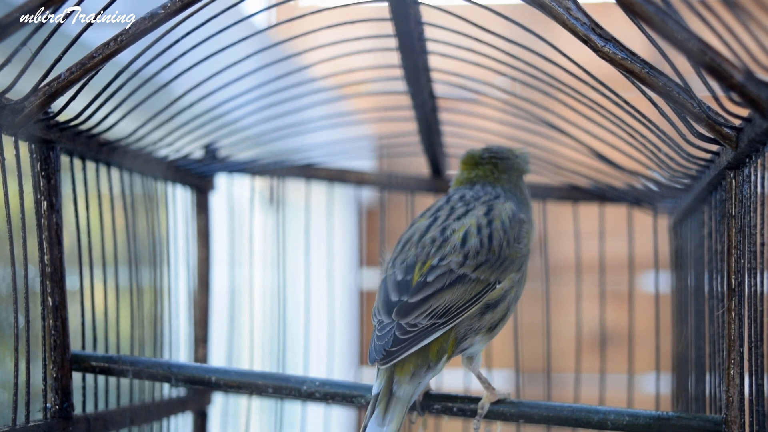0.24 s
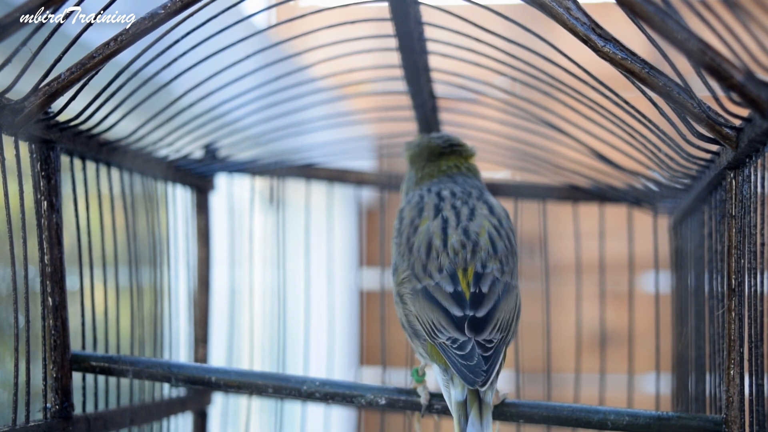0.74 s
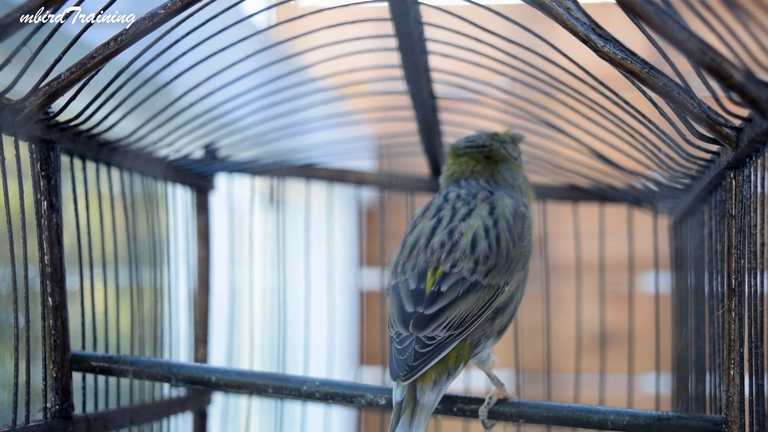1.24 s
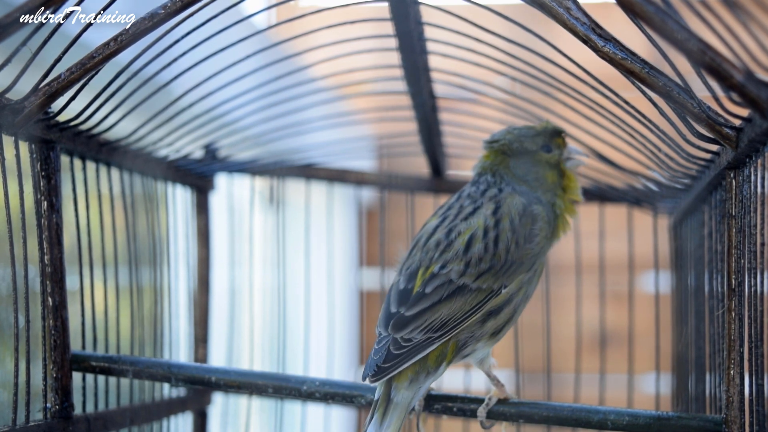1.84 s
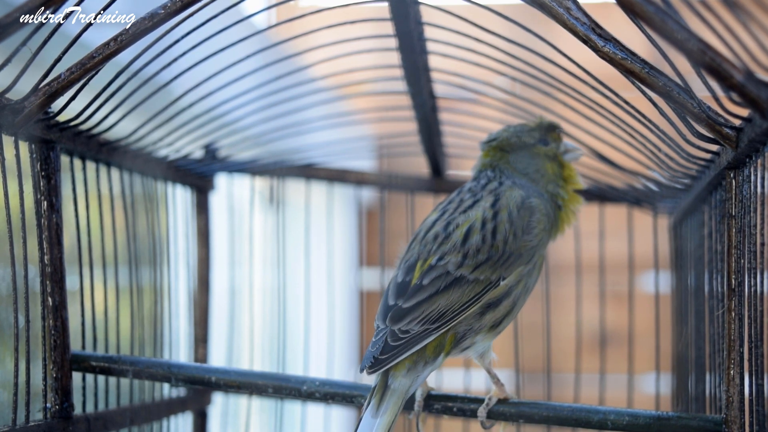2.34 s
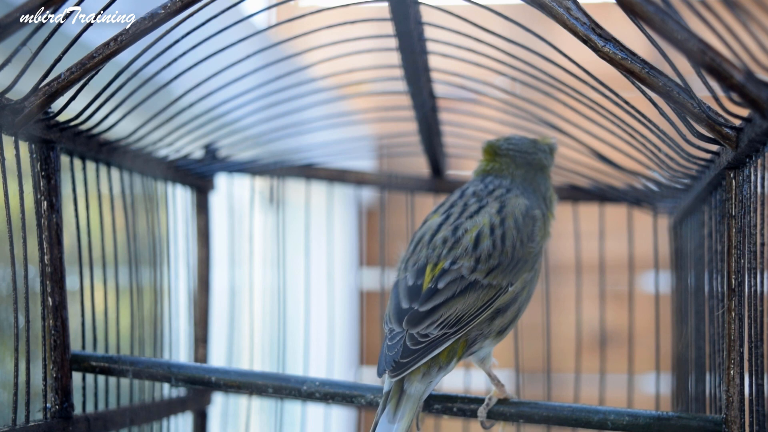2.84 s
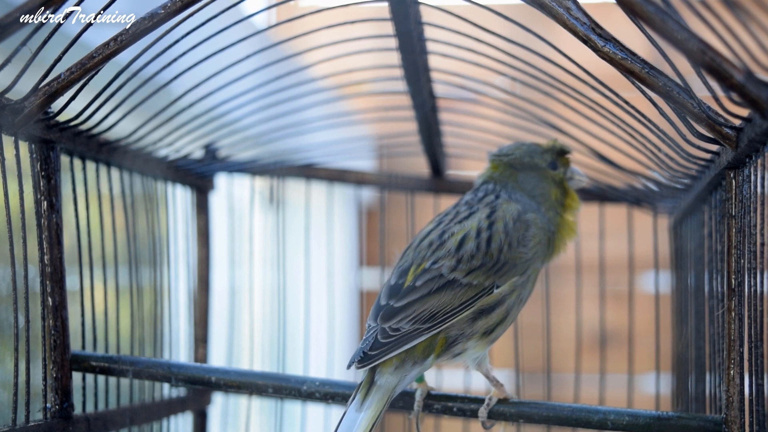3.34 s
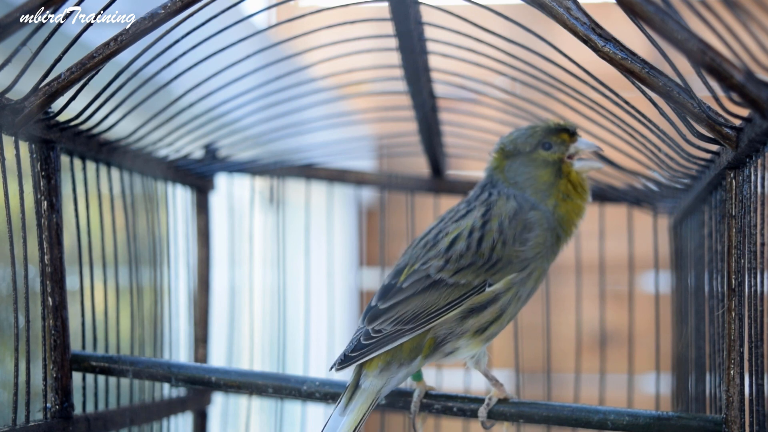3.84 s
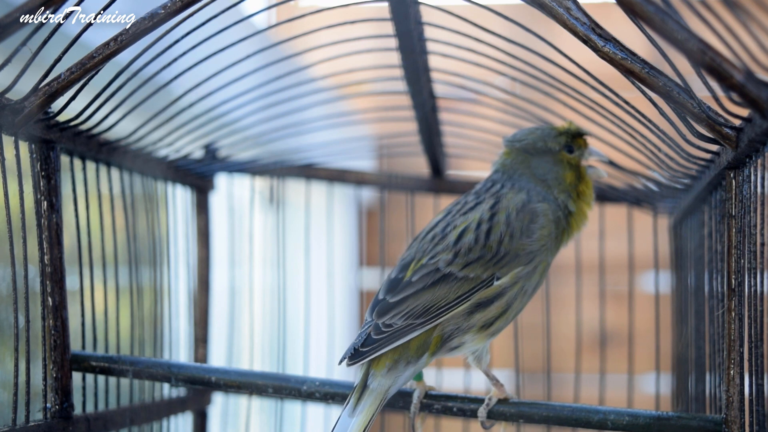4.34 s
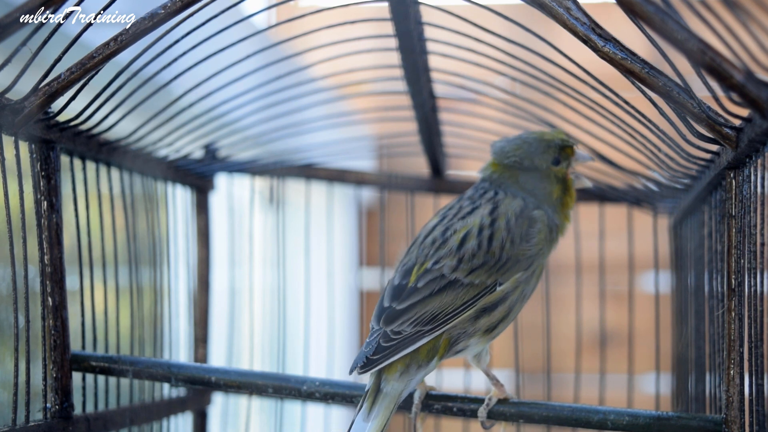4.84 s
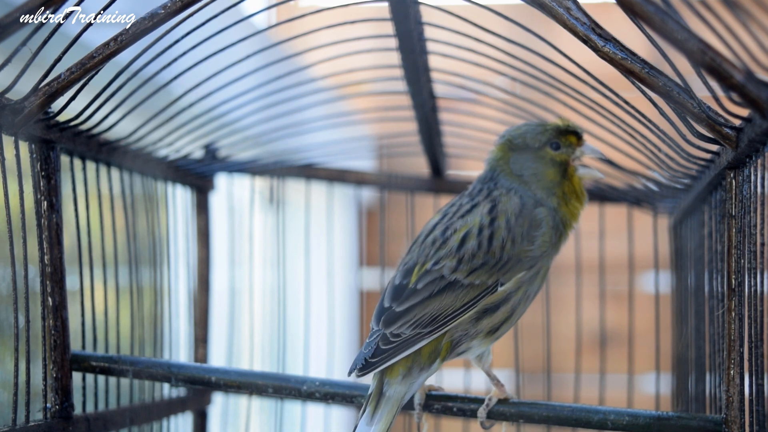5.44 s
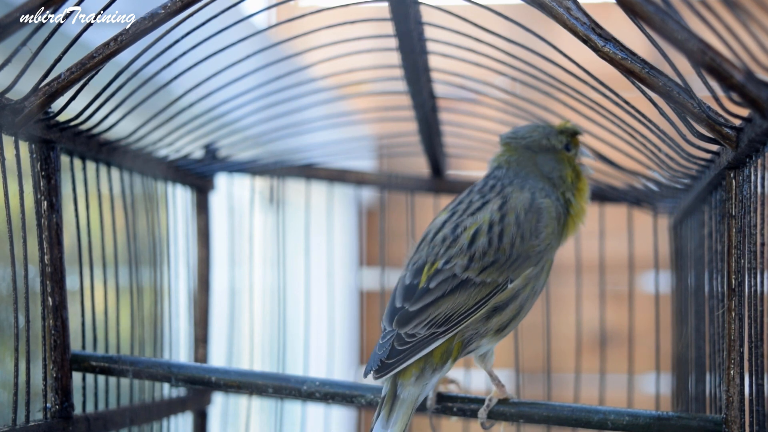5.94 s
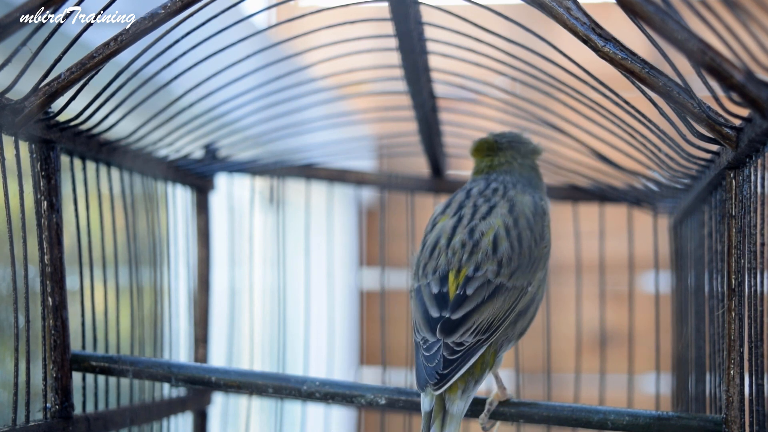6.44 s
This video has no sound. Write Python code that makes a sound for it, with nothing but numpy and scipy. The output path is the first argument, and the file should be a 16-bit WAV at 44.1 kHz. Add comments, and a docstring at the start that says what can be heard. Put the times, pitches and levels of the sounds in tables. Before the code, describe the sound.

In a small room, a nearby canary sings almost without pause: a slurred whistle, fast trills of falling and rising notes, a rapid roll, a brief repeated motif, and finally a run of longer upward whistles. The tones are pure and high, with slight reflections from close walls. Dull background noise swells a little in the gaps, and a hoot and later a thin whistle come faintly from far-off birds.

```python
"""A small room, with a caged canary singing close by: slurred whistles, trills, a fast roll, a short motif.
Each phrase repeats practised syllables, almost pure tones swept by the syrinx; the walls answer within
milliseconds. The recorder's limiter ducks on every loud note, so the room noise swells in the pauses.
Far off, other birds hoot and whistle faintly."""
import sys
import numpy as np
from scipy import signal
from scipy.fft import rfft, irfft, next_fast_len
from scipy.io import wavfile
from scipy.ndimage import uniform_filter1d, minimum_filter1d

SR = 44100
rng = np.random.default_rng(int(sys.argv[2]) if len(sys.argv) > 2 else 0)


def bounce(signal):
    """Save signal as a 16-bit WAV file at the path given by the first command-line argument."""
    frames = np.transpose(np.atleast_2d(signal))
    limited = np.clip(frames, -1, 1)
    pcm = np.round(limited * 32767).astype(np.int16)
    wavfile.write(sys.argv[1], SR, pcm)


N = 295029
LEAD = SR // 2  # the song is already under way: samples before time zero
TIME = np.arange(-LEAD, N) / SR


def amp(db):
    """Decibels to gain."""
    return 10 ** (np.asarray(db) / 20)


def unit(x):
    """Scale to rms 1."""
    return x / np.sqrt(np.mean(x ** 2) + 1e-20)


def along(points, hz):
    """Read a curve of (Hz, value) points on a log frequency axis."""
    point_hz, values = np.transpose(points)
    return np.interp(np.log(hz + 1), np.log(point_hz + 1), values)


def wobble(rate):
    """A random curve with `rate` knots a second."""
    at = (TIME - TIME[0]) * rate
    knots = rng.standard_normal(int(at[-1]) + 2)
    return np.interp(at, np.arange(len(knots)), knots)


def filtered(x, response):
    """Equalise x with a gain given as a function of Hz."""
    size = next_fast_len(x.shape[-1] + 8192)
    return irfft(rfft(x, size) * response(np.fft.rfftfreq(size, 1 / SR)), size)[..., :x.shape[-1]]


def syllable(shape, t, stretch, pitch, bright_db):
    """One sweep of the syrinx: a near-pure tone with faint overtones, raspier on low notes."""
    # Levels in dB of the second to fifth harmonic, before the throat colours them.
    harmonic_db = [-29.5, -33, -55, -49.5]
    # The throat's colour on the overtones. Each row: frequency in Hz, gain in dB.
    throat = [(3000, 17.5), (4300, 10.5), (5500, -5.5), (7000, -0.5), (9000, 0.5), (11000, 1), (12300, 4),
              (14000, 1)]
    pure_hz, flicker_db = 4360, 3.5  # the voice is purest above pure_hz; each overtone comes and goes
    ms, hz, db = np.transpose(shape)
    knots = np.sort(ms) * stretch / 1000

    def rounded(values):
        """Muscles move without corners."""
        return uniform_filter1d(np.interp(t, knots, values), size=len(t) // 24 + 1)

    sweep_hz = rounded(hz) * pitch
    slack = np.clip(np.log2(pure_hz / sweep_hz), 0, .8)  # slack membranes beat less evenly
    waver = unit(uniform_filter1d(rng.standard_normal(len(t)), size=30))
    phase = 2 * np.pi * np.cumsum(sweep_hz * (1 + 0.039 * slack ** 2 * waver)) / SR
    overtones = np.zeros(len(t))
    for k, base_db in enumerate(harmonic_db, 2):
        flicker = np.interp(t, np.linspace(t[0], t[-1], num=9), rng.standard_normal(9))
        level_db = base_db + along(throat, k * sweep_hz) + flicker_db * flicker + rng.normal(0, 3.8)
        overtones += amp(level_db) * np.sin(k * phase) * (k * sweep_hz < SR / 2)
    rasp = amp(-58 + 30 * slack) * rng.standard_normal(len(t))
    fade_s = (knots[-1] - knots[0]) / 32 + .0003  # long notes open and close more gently
    gate = np.clip(np.minimum(t - knots[0], knots[-1] - t) / fade_s, 0, 1)
    return (np.sin(phase) + amp(bright_db) * (overtones + rasp)) * gate * amp(rounded(db))


def phrase(shape, cues, tremor, effort_db, bright_db):
    """Sing one syllable at every cue; a wider beak (bright_db) lets out more overtones and rasp."""
    song = np.zeros(len(TIME))
    edges_ms = np.array([shape[0][0], shape[-1][0]])
    for s, db, stretch, pitch in cues:
        span = slice(*np.searchsorted(TIME, s + edges_ms * stretch / 1000))
        note = syllable(shape, TIME[span] - s, stretch, pitch * tremor[span], bright_db)
        song[span] += amp(db + effort_db) * note
    return song


def pip_cues(whistle_cues, lead_s, stretch, pitch):
    """Cues for the pips with which the voice catches just before each whistle."""
    return [(s - lead_s, db, stretch, pitch) for s, db, *_ in whistle_cues]


def whistles(tremor):
    """Long upward slurs open and close the song, each led by a pip; higher whistles have higher pips."""
    # Syllable shapes, before stretch and transposition. Each row: ms from the cue, pitch in Hz, dB.
    pip = [(0, 2800, -29), (2, 2105, -5), (6, 1800, -8.5), (10, 1900, -22)]
    slur = [(0, 2300, -22), (12.16, 2950, -9), (34.8, 3650, -2), (55.4, 4050, -2.5), (85.4, 4450, -6),
            (152, 4540, -16.5), (173.6, 4560, 1), (184, 4540, -34)]
    high_whistle = [(0, 2150, -24), (9.2, 3660, -9.5), (19.2, 4450, -5), (40.9, 5000, -1.5),
                    (89.6, 5600, -7.5), (93, 5850, -22.5), (103.7, 6100, -7.5), (136, 6300, -6.5),
                    (158.3, 6470, -1), (172.4, 7050, -6), (173, 8100, -38)]
    step_whistle = [(0, 2370, -17.5), (13.95, 4000, -6), (26, 4500, 2), (81.9, 4730, -5.5), (99, 5240, -4),
                    (131, 5780, -9), (151, 5950, 0.5), (168.3, 5900, -4.5), (185, 5870, -25)]
    low_whistle = [(0, 2380, -25), (12, 3100, -9.5), (33, 3635, -4), (66.1, 4100, -6), (98.5, 4450, -9),
                   (128, 5185, -.5), (169.8, 5400, 2.5), (193.2, 5340, 1), (218.5, 5280, -10),
                   (236.3, 5270, -27)]
    last_whistle = [(0, 2300, -28.5), (12, 3100, -13), (36, 3630, -7), (56, 3880, -3.5), (80, 4270, -16),
                    (104, 4680, -3), (138, 4780, -4), (156, 5020, 0.5), (175, 5150, 1)]
    # Cues. Each row: start in seconds, gain in dB, time stretch, pitch ratio.
    slur_cues = [(-.2, 8, 0.96, 1.052), (0.045, 2.5, 1.01, .999)]
    high_cues = [(4.364, 0.44, 0.75, 1.002), (4.539, 2.3, 0.94, 1.005), (4.741, 1.2, 1, 0.998),
                 (4.956, 2, 0.99, 0.98)]
    step_cues = [(5.172, 3.9, 1.024, 1.002), (5.396, 3.5, 1.06, .975)]
    low_cues = [(5.646, 1.4, 1.047, 0.99), (5.941, 3.1, 1.02, 1), (6.233, 4.4, 1.004, 1.012)]
    last_cues = [(6.527, 3.2, 1.024, 1)]
    high_pips = pip_cues(high_cues + step_cues, lead_s=0.0076, stretch=1.2, pitch=1.7)
    low_pips = pip_cues(slur_cues + low_cues + last_cues, lead_s=0.0068, stretch=.9, pitch=1.013)
    return (phrase(pip, high_pips, tremor, effort_db=-20, bright_db=1)
            + phrase(pip, low_pips, tremor, effort_db=-12, bright_db=10)
            + phrase(slur, slur_cues, tremor, effort_db=-2.2, bright_db=-5.5)
            + phrase(high_whistle, high_cues, tremor, effort_db=2.5, bright_db=-2.5)
            + phrase(step_whistle, step_cues, tremor, effort_db=-1, bright_db=0)
            + phrase(low_whistle, low_cues, tremor, effort_db=0.6, bright_db=-4)
            + phrase(last_whistle, last_cues, tremor, effort_db=3.7, bright_db=-4.5))


def room(x, tail_db, build_s):
    """Direct sound, echoes off a few near walls, then a short diffuse tail."""
    # Early echoes. Each row: delay in ms, level in dB.
    wall_echoes = [(3.1, -23), (8.4, -10), (15.8, -26.5), (22.3, -23.5)]
    # The tail's decay. Each row: frequency in Hz, seconds to fall by 60 dB.
    decay_times = [(500, 0.2), (2500, 0.22), (5000, 0.19), (9000, 0.2), (15000, 0.25)]
    hz, t, spectrum = signal.stft(rng.standard_normal(SR // 2), SR, nperseg=256)
    fading = amp(-60 * t / along(decay_times, hz)[:, None])
    tail = signal.istft(spectrum * fading, SR, nperseg=256)[1]
    tail *= 1 - np.exp(-np.arange(len(tail)) / SR / build_s)
    response = amp(tail_db) * tail / np.linalg.norm(tail)
    response[0] = 1
    for ms, db in wall_echoes:
        response[round(ms * SR / 1000)] += amp(db)
    return signal.fftconvolve(x, response)[:len(x)]


def room_tone(level_db):
    """A steady, dull bed of background noise."""
    # The noise's colour. Each row: frequency in Hz, relative spectral density in dB.
    noise_colour = [(20, -34), (38, -5), (80, -8), (200, -4.5), (400, -10), (800, -9), (1600, -12),
                    (3000, -18.5), (5000, -11.5), (8000, -35), (15000, -27.5)]
    bed = filtered(rng.standard_normal(len(TIME)), lambda hz: amp(along(noise_colour, hz)))
    return amp(level_db + 0.26 * wobble(8.4)) * unit(bed)


def trill_cues(beat, onset_db, settle_s, stretch, lengthen, pitch, climb):
    """Cues for a trill: the level settles from onset_db; length and pitch drift by a share over the run."""
    first_s, gap_s, slowing_s, count = beat
    n = np.arange(count)
    elapsed = gap_s * n + slowing_s * n * (n - 1) / 2
    progress = n / (count - 1) - .5
    level_scatter, length_scatter, pitch_scatter = rng.standard_normal((count, 3)).T  # no two are alike
    return np.transpose([first_s + elapsed,
                         onset_db * np.exp(-elapsed / settle_s) + 1.1 * level_scatter,
                         stretch * (1 + lengthen * progress + .045 * length_scatter),
                         pitch * (1 + climb * progress + .01 * pitch_scatter)])


def trills(tremor):
    """A two-note trill, one of falling notes, one of rising notes, then a chuck that starts the roll."""
    # Syllable shapes, before stretch and transposition. Each row: ms from the cue, pitch in Hz, dB.
    chup = [(-14, 1900, -28), (-11.5, 2600, -9.5), (-8.5, 1950, -24), (-4.5, 2400, -4), (1, 2780, .5),
            (4.5, 2480, -3), (8, 1720, -16), (13.5, 1150, -32)]
    tick = [(-2.6, 5300, -22), (-1, 5150, -3), (.6, 4700, 1), (1.5, 4150, -4), (2.4, 3800, -22)]
    fall = [(-41, 7380, -23), (-33, 7300, -21), (-17, 6250, -25), (-9.5, 5780, -13), (-3, 5380, 0),
            (2, 5000, -1), (5.5, 4600, -12), (9, 3900, -10), (12, 3400, -24)]
    rise = [(-29.5, 1600, -30), (-27.5, 2550, -12), (-24.5, 3080, -5), (-19, 3520, -16), (-8, 3980, -14),
            (-2.5, 4480, -6), (.5, 4880, 1.5), (4.5, 5550, -4), (7.5, 6200, -7), (14, 5800, -22)]
    chuck = [(-36.5, 2050, -29), (-16, 2050, -7.5), (-12, 2700, -7), (0.5, 2750, 4), (7.5, 1800, -10.5),
             (9, 1200, -18), (18.5, 870, -37)]
    roll = [(0, 3200, -18), (.9, 2800, 0), (2.3, 2400, 0), (4, 1900, -14), (5.5, 1550, -32), (9, 2600, -32),
            (17, 2880, -16), (26, 3180, -13), (32, 3330, -18), (35, 3350, -36)]
    # Rhythms. Each gives: first cue, first gap and growth of each next gap in seconds, syllable count.
    chup_beat = (.3033, .0642, .0005, 9)
    tick_beat = (.3307, .065, .00038, 9)
    fall_beat = (1.0012, .0886, 0, 8)
    rise_beat = (1.7091, .0624, .00032, 12)
    roll_beat = (2.7529, .03325, .000175, 22)
    # A chuck and a low tick frame the roll. Each row: cue in seconds, gain in dB, stretch, pitch ratio.
    opening_chuck = [(2.690, -9, 1.2, 0.98)]
    closing_tick = [(3.5308, 0, 0.99, .57)]
    chups = trill_cues(chup_beat, -9, settle_s=.078, stretch=.99, lengthen=.023, pitch=.985, climb=.016)
    ticks = trill_cues(tick_beat, 0, settle_s=.12, stretch=.8, lengthen=.054, pitch=.995, climb=.005)
    falls = trill_cues(fall_beat, -1.5, settle_s=.15, stretch=1.01, lengthen=.08, pitch=.94, climb=-.0066)
    rises = trill_cues(rise_beat, 1, settle_s=.2, stretch=1.001, lengthen=-.057, pitch=.99, climb=-.014)
    rolls = trill_cues(roll_beat, -10.5, settle_s=.26, stretch=.87, lengthen=.058, pitch=1.003, climb=.086)
    return (phrase(chup, chups, tremor, effort_db=-4, bright_db=.5)
            + phrase(tick, [*ticks, *closing_tick], tremor, effort_db=-1, bright_db=5)
            + phrase(fall, falls, tremor, effort_db=2.5, bright_db=-2.8)
            + phrase(rise, rises, tremor, effort_db=-1.5, bright_db=0.1)
            + phrase(chuck, opening_chuck, tremor, effort_db=-5, bright_db=5.5)
            + phrase(roll, rolls, tremor, effort_db=0, bright_db=2.5))


def far_birds():
    """A faint hoot and later a thin whistle, both blurred by their long way."""
    # The two calls. Each row: time in seconds, pitch in Hz, level in dB.
    far_hoot = [(1.731, 733, -64), (1.759, 752, -37.5), (1.86, 735, -43.5), (1.92, 687, -51),
                (1.98, 669, -45.5), (2.03, 718, -53), (2.12, 693, -57.5)]
    far_whistle = [(4.62, 2670, -61.5), (4.68, 2670, -45), (4.9, 2706, -65), (5.1, 2820, -50),
                   (5.3, 2800, -63), (5.6, 2660, -55), (5.66, 2820, -51)]
    calls = np.zeros(len(TIME))
    for contour in (far_hoot, far_whistle):
        s, hz, db = np.transpose(contour)
        phase = 2 * np.pi * np.cumsum(np.interp(TIME, s, hz)) / SR
        blurred = (1 + 0.46 * wobble(70)) * np.sin(phase) + 0.94 * wobble(70) * np.cos(phase)
        calls += amp(np.interp(TIME, s, db, left=-120, right=-120)) * blurred
    return calls


def round_cues(first_round, onset_db, round_s=.1883, count=4):
    """Cues for a motif: each note returns once a round, its level settling from onset_db."""
    cues = []
    for s, db, stretch, pitch in first_round:
        beat = (s, round_s, 0, count)
        repeats = trill_cues(beat, onset_db, round_s / 2, stretch, lengthen=0, pitch=pitch, climb=.018)
        cues.append(repeats + [0, db, 0, 0])
    return np.vstack(cues)


def motif(tremor):
    """Flick, short whip, cluck, flick, long whip: sung round after round."""
    # Syllable shapes, before stretch and transposition. Each row: ms from the cue, pitch in Hz, dB.
    flick = [(-0.77, 3600, -16), (0, 4780, -1.5), (0.5, 5550, 2), (2.5, 5900, -6.5), (4.5, 6190, -5),
             (6.5, 6600, -32)]
    whip = [(-5.5, 2350, -24.5), (-1.5, 2750, -6), (0, 3100, -2.5), (3.5, 3900, 0), (5, 4700, 0),
            (12, 5280, -1), (21.5, 5450, -14), (18, 3700, -39.5)]
    cluck = [(-2, 1700, -11), (0, 2050, 1), (1.5, 2510, -4.5), (6, 3200, -17), (13.5, 2200, -15),
             (14.5, 1580, -13.5), (18.5, 1020, -17.5), (23, 1030, -44)]
    # The first round. Each row: cue in seconds, gain in dB, time stretch, pitch ratio.
    flick_cues = [(3.5953, -.5, 1.1, 1), (3.6936, 3, 0.66, .89)]
    whip_cues = [(3.613, 0, 1, 1.005), (3.716, 1.5, 1.55, 1.03)]
    cluck_cues = [(3.661, -12, 1, 1.03)]
    return (phrase(flick, round_cues(flick_cues, onset_db=-4), tremor, effort_db=-2, bright_db=3.5)
            + phrase(whip, round_cues(whip_cues, onset_db=-1), tremor, effort_db=-4, bright_db=0)
            + phrase(cluck, round_cues(cluck_cues, onset_db=0.7), tremor, effort_db=2, bright_db=4.5))


def canary():
    """The whole song, phrase after phrase; pitch and loudness are never perfectly steady."""
    tremor = 1 + 0.0027 * wobble(35) + 0.0011 * wobble(180)
    flutter_db = 0.5 * wobble(50) + 2.1 * wobble(160)
    return (trills(tremor) + motif(tremor) + whistles(tremor)) * amp(flutter_db)


def scene():
    """The canary and two distant calls in the room, over its noise."""
    voices = canary() + far_birds()
    mix = room(voices, tail_db=-6.5, build_s=0.0019) + room_tone(level_db=-45)
    return mix[None, LEAD:]


def limiter(x, ceiling_db, release_db_per_s, start_cut_db):
    """The gain drops at once on a peak over the ceiling and creeps back; earlier notes have left it low."""
    over_db = np.maximum(20 * np.log10(np.abs(x) + 1e-9) - ceiling_db, 0)
    recovery_db = release_db_per_s * np.arange(N) / SR
    cut_db = np.maximum.accumulate(np.maximum(over_db + recovery_db, start_cut_db), axis=-1) - recovery_db
    gain = minimum_filter1d(amp(-cut_db), size=40)  # a short look-ahead
    return x * uniform_filter1d(uniform_filter1d(gain, size=48), size=48)


def record(dry):
    """Microphone colour, limiter, then the recorder's band limit."""
    # The microphone's treble colour. Each row: frequency in Hz, gain in dB.
    mic_colour = [(7000, -0.14), (8500, 1.5), (11500, -0.5), (13500, 0), (15500, -3.5)]
    picked_up = filtered(dry, lambda hz: amp(along(mic_colour, hz)))
    limited = limiter(picked_up, ceiling_db=-7.5, release_db_per_s=53, start_cut_db=11.5)
    return filtered(limited, lambda hz: hz < 15800)


dry = scene()
out = record(dry)
bounce(out)
```